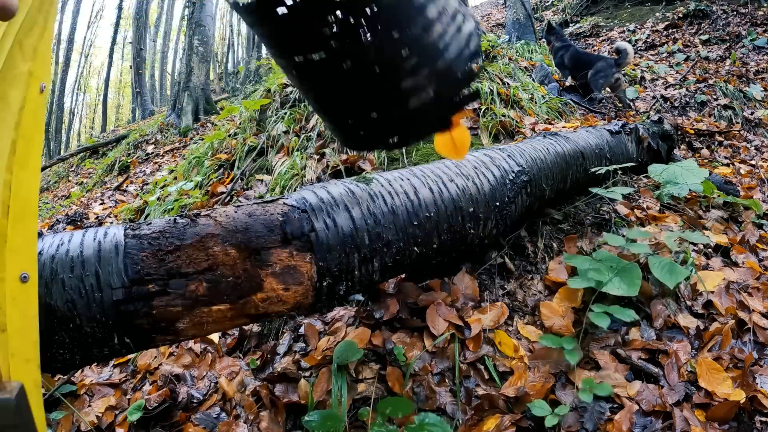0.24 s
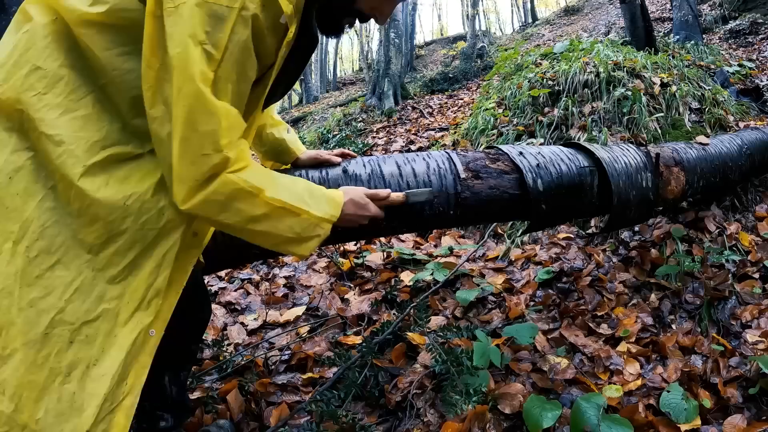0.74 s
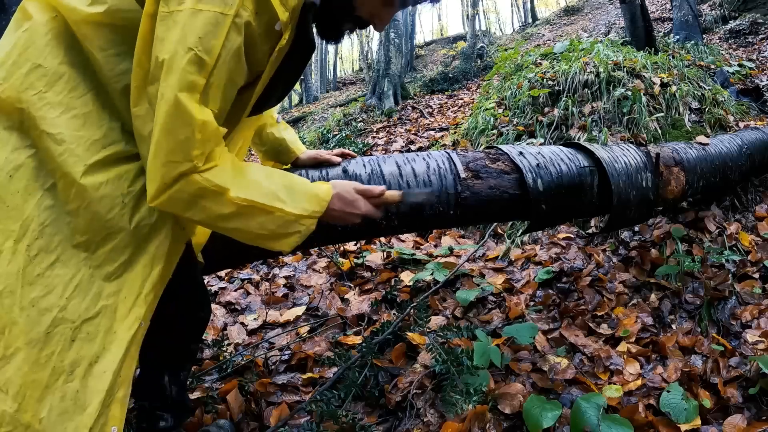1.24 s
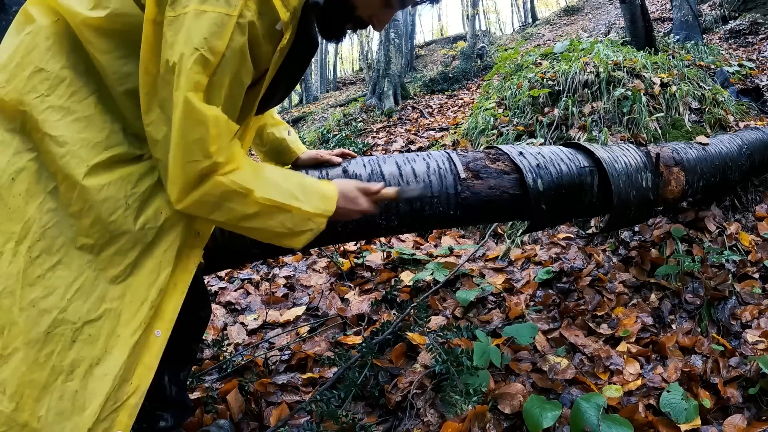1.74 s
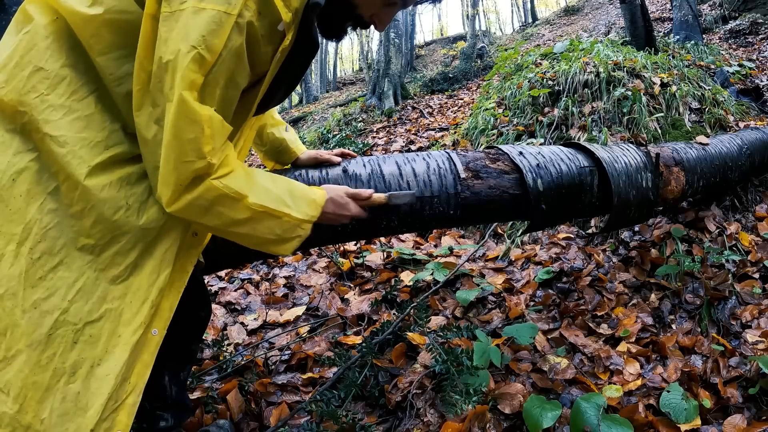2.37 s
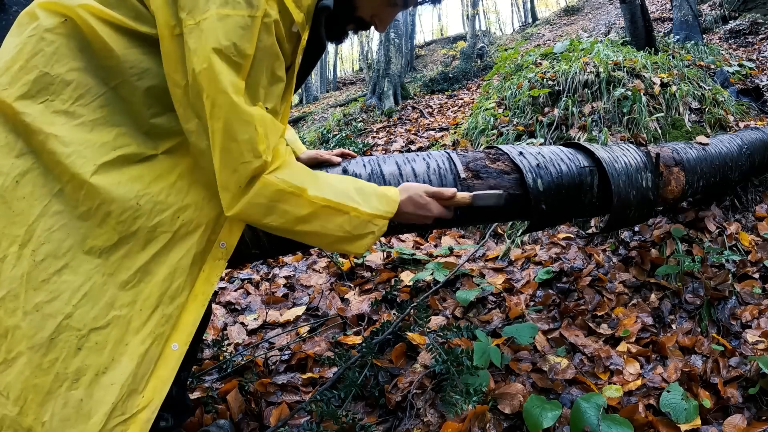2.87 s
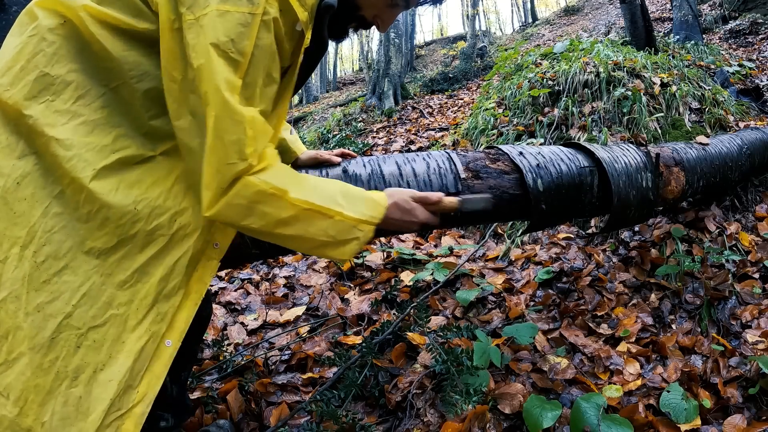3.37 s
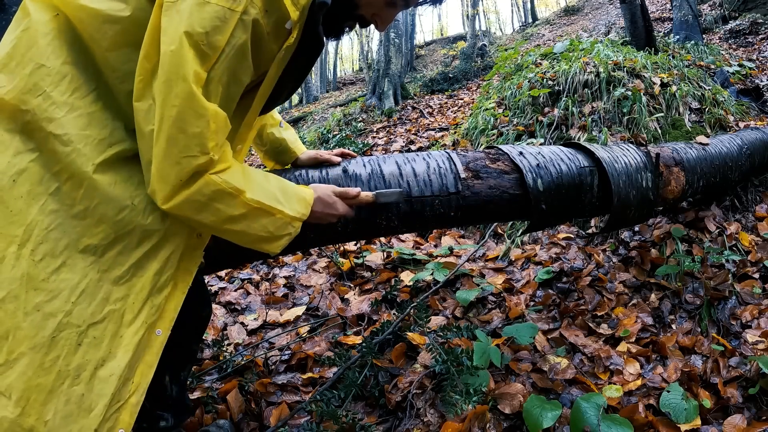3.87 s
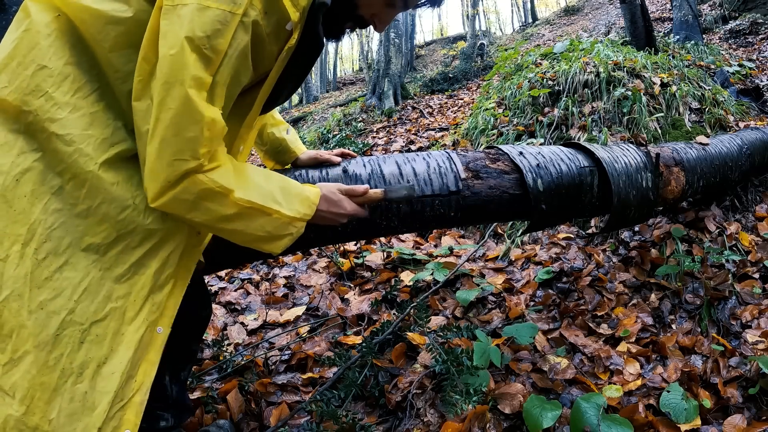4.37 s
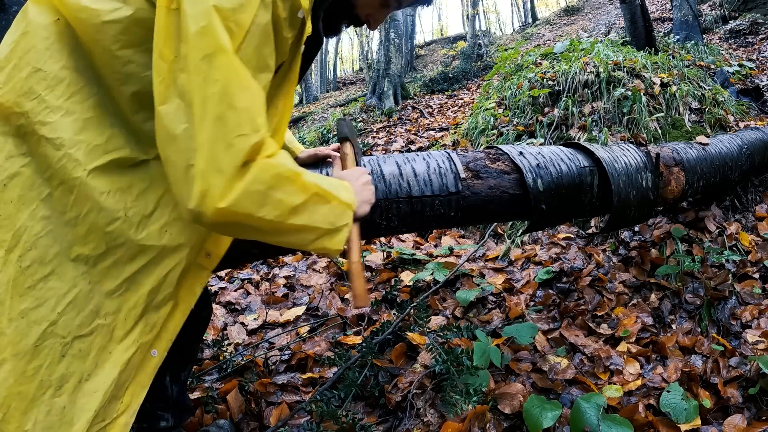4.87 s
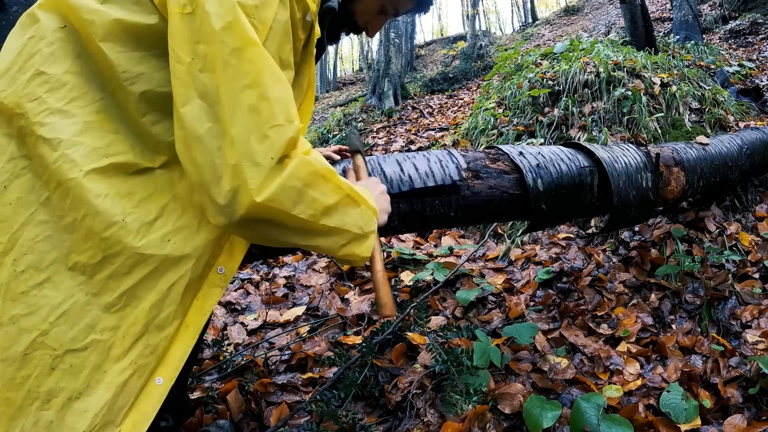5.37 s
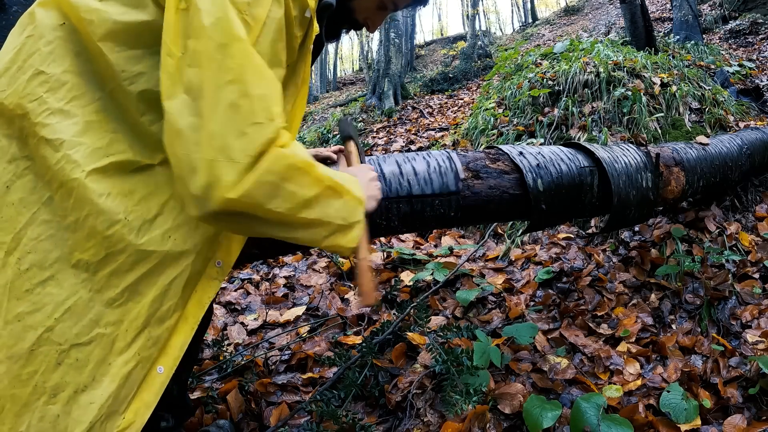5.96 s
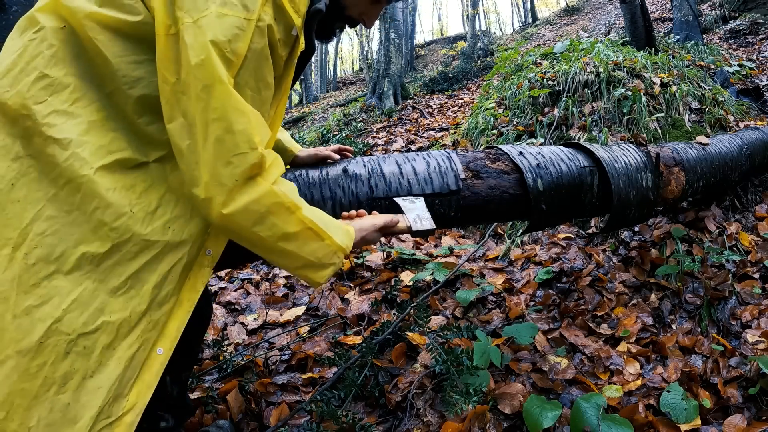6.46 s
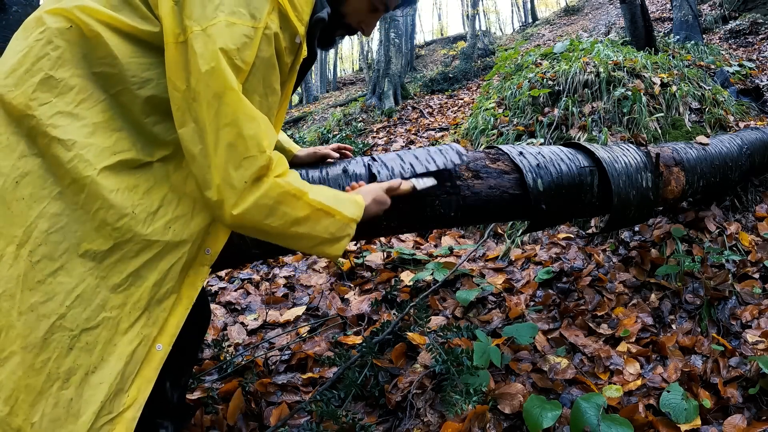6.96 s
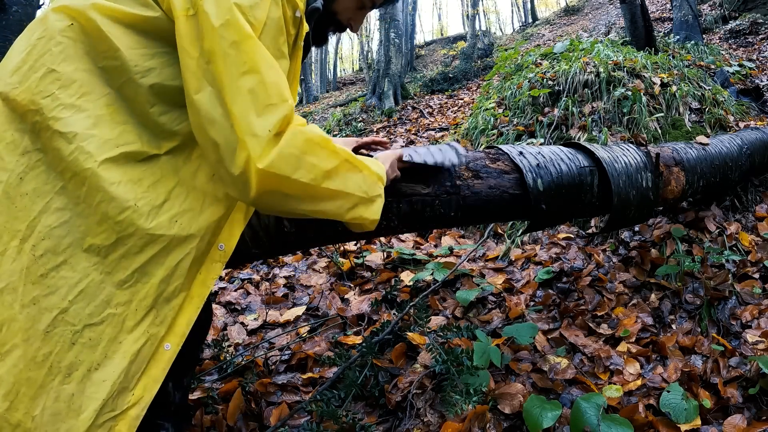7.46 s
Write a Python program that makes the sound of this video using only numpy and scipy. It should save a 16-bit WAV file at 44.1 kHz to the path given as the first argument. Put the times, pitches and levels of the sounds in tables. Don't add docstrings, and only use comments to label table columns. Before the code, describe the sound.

In a quiet wet forest, a sheet of bark crackles and snaps onto leaves, thinning within half a second. A small blade then bites a log in irregular dry knocks, the hardest near two, three and four seconds, with short hollow wooden thuds. Fibres tick and a stiff coated jacket rubs between blows. Close stereo microphone, slight low wind rumble.

```python
import sys
import numpy as np
from scipy import signal
from scipy.fft import rfft, irfft, next_fast_len
from scipy.io import wavfile
from scipy.ndimage import uniform_filter1d, map_coordinates

SR = 44100
rng = np.random.default_rng(int(sys.argv[2]) if len(sys.argv) > 2 else 0)


def transcribe(u):
    v = np.clip(np.atleast_2d(u).T, -1, 1)
    q = np.round(v * 32767).astype(np.int16)
    wavfile.write(sys.argv[1], SR, q)


def undo_db(level):
    steps = np.asarray(level, float) / 20
    return 10 ** steps


N = 340011

TICK_T60_S, TICK_CRACK_DB = .009, -16


def unit(x):
    return x / np.sqrt(np.mean(x ** 2) + 1e-20)


def gain(points, hz):
    f, db = np.transpose(points)
    return undo_db(np.interp(np.log(hz + 1), np.log(f), db))


def curves(rows):
    s, *cols = np.transpose(rows)
    return [np.interp(np.arange(N) / SR, s, c) for c in cols]


def wobble(rate):
    knots = rng.standard_normal(int(N * rate / SR) + 4)
    return map_coordinates(knots, [np.arange(N) * rate / SR])


def filtered(x, response):
    m = next_fast_len(x.shape[-1] + 2048)
    return irfft(rfft(x, m) * response(np.fft.rfftfreq(m, 1 / SR)), m)[..., :x.shape[-1]]


def add(track, s, sound):
    i = round(s * SR)
    track[..., i:i + sound.shape[-1]] += sound


def rush(colour, side_db, grain_db, patchy_db):
    z = signal.stft(rng.standard_normal((2, N)), nperseg=512)[2]
    patches = uniform_filter1d(rng.standard_normal(z.shape[1:]), size=6, axis=0)
    patches = uniform_filter1d(patches, size=8, axis=1)
    pair = signal.istft(z * undo_db(patchy_db * unit(patches)), nperseg=512)[1][:, :N]
    mid, side = filtered(pair * undo_db(grain_db * wobble(700)), lambda hz: gain(colour, hz))
    side = undo_db(side_db) * filtered(side, lambda hz: 1 + (hz / 11500) ** 3)
    return unit(np.array([mid + side, mid - side]))


def from_log(x):
    # frequency_hz, left_minus_right_db, left_lead_rad
    ports = [(60, .2, -.04), (300, -.3, -.1), (1000, -.8, -.28), (2700, -.8, -.4), (7600, 1.5, -.25),
             (10800, 2.5, -.4), (12200, .5, -2.3), (15000, .5, -2.3)]
    f, db, lead = np.transpose(ports)
    half = lambda hz: undo_db(np.interp(hz, f, db) / 2) * np.exp(.5j * np.interp(hz, f, lead))
    return np.array([filtered(x, half), filtered(x, lambda hz: 1 / half(hz))])


def snaps(rows, rough_db, upper_db, narrow):
    out, t = np.zeros(N + SR), np.arange(1300) / SR
    noise = rng.standard_normal((len(rows), 2, len(t)))
    bright = filtered(noise[:, 0], lambda f: 1 / (1 + (3500 / (f + 1)) ** 4) / (1 + (f / 11000) ** 4))
    for (s, db, hz, t60, crack_db), fizz, raw in zip(rows, bright, noise[:, 1]):
        decay = undo_db(-60 * t / max(t60, .001))
        upper_hz = hz * (2.09 + 0.4 * raw[0])
        upper = undo_db(upper_db) * np.sin(2 * np.pi * upper_hz * t) * decay
        onset = 1 - np.exp(-(1.3 * t * hz) ** 2)
        ring = (upper - np.sin(2 * np.pi * hz * t)) * onset * decay
        resonance = lambda f: (f * hz / (hz * hz + f * f)) ** narrow / (1 + (f / hz / 3) ** 2)
        rough = unit(filtered(raw, resonance))
        ring = ring / np.abs(ring).max() + undo_db(rough_db) * rough * np.sqrt(decay)
        late = t - .55 / hz
        crack_t60 = .002 + .5 * t60
        crack = undo_db(crack_db + 4) * fizz * undo_db(-60 * np.maximum(late, -6 * late) / crack_t60)
        add(out, s - 0.5 / hz, undo_db(db) * (ring + crack))
    return out[:N]


def crack_level(db, hz):
    return db - 3 * np.log2(hz / 3500)


def forest():
    # frequency_hz, level_db
    wash_colour = [(100, -42), (170, -4), (330, 2.5), (500, -3), (1000, -6), (2500, -45), (8000, -37),
                   (15000, -35)]
    # frequency_hz, level_db
    rumble_colour = [(12, -35), (30, -0.5), (65, -2.5), (110, -7.5), (160, -15), (300, -47)]
    # time_s, level_db
    wind = [(0, -51.5), (.3, -49.5), (.5, -61), (.9, -55), (1.6, -61), (2.3, -56.5), (2.55, -65),
            (2.9, -54), (3.3, -56), (3.6, -64.5), (4.1, -61.5), (4.5, -62.5), (5.2, -58.5), (6, -57),
            (6.5, -54.5), (6.75, -56.5), (7.2, -54), (7.71, -52.5)]
    wash = undo_db(-59.5) * rush(wash_colour, side_db=-13, grain_db=0.0, patchy_db=1.0)
    lumps = undo_db(2.5 * wobble(9))
    rumble = unit(lumps * rush(rumble_colour, side_db=-25.0, grain_db=-2.8, patchy_db=2.0))
    return wash + undo_db(curves(wind)[0]) * rumble


def rubbing():
    # middle_s, width_s, rub_db, hiss_over_rub_db
    sweeps = [
        (2.73, 0.2, -44, -8),
        (3.63, 0.11, -47, -3),
        (5.81, 0.036, -45, -14.5),
        (6.135, 0.04, -45, -7.5),
        (6.43, 0.095, -42, -3),
        (7.04, 0.085, -44.5, -2),
        (7.47, 0.19, -49.5, -6),
    ]
    # fastest_s, width_s, rub_db, hiss_over_rub_db
    swishes = [(.05, 0.1, -42.5, -7.5), (.13, 0.051, -45.5, 0.5), (.25, 0.13, -51, -4),
               (.45, 0.1, -51.5, -4.5), (.76, 0.39, -57, -7.5), (1.44, 0.061, -54.5, -16.5),
               (1.79, 0.055, -51.5, -9), (2.1, 0.44, -60.5, -5), (2.62, 0.28, -78, -21),
               (3.03, 0.091, -56, -7), (3.27, 0.12, -58.5, -3.5), (3.52, 0.13, -53, -11),
               (3.77, 0.13, -53.5, -11), (4.4, 0.22, -52, -9), (4.7, 0.26, -63, 1),
               (5.62, 0.025, -51, -4.5), (5.93, 0.36, -60, -1), (6.055, 0.034, -52, -4),
               (6.2, 0.036, -46.5, -9.5), (6.285, 0.095, -50, -9), (6.55, 0.11, -50.5, -16.5),
               (6.78, 0.29, -53, -13), (7.17, 0.091, -49, -16), (7.33, 0.2, -58, -7.5),
               (7.62, 0.044, -52, -3.5), (7.71, 0.081, -47.5, -4)]
    jolts = [
        1.201,
        1.565,
        5.173,
        5.451,
    ]
    lag_s, jolt_width_s, jolt_db, jolt_hiss_db = 0.048, 0.096, -49, -10.5
    rest_db, rest_hiss_db = -59, -8.5
    flank_db, tail = 14.5, 1.094
    shaken = [(s + lag_s, jolt_width_s, jolt_db, jolt_hiss_db) for s in jolts]
    s, width, db, hiss_db = np.transpose(list(sweeps) + list(swishes) + shaken)[..., None]
    t = np.linspace(0, N / SR, num=2000)
    away = np.maximum(s - t, (t - s) / tail) / width
    shape = np.where(np.arange(len(s)) < len(sweeps), 2.2, 1.4)[:, None]
    power = undo_db(-2 * np.minimum(flank_db * away ** shape - db, 200))
    body = undo_db(2 * rest_db) + power.sum(axis=0)
    hiss = undo_db(2 * (rest_db + rest_hiss_db)) + (power * undo_db(2 * hiss_db)).sum(axis=0)
    return curves(np.transpose([t, 10 * np.log10(body), 10 * np.log10(hiss)]))


def jacket():
    # frequency_hz, level_db
    body_colour = [(150, -21), (350, -9.5), (700, -15), (1100, -6.5), (1450, -7), (1900, -12),
                   (3000, -25.5), (5000, -48.5)]
    # frequency_hz, level_db
    hiss_colour = [(1200, -21), (2200, 2), (3200, 3), (7000, 2), (15000, -12.5)]
    # time_s, level_db
    facing = [(0, 1), (1.5, -19), (4.1, -3), (4.9, 3), (6.1, 4), (6.75, -15), (7.1, 6.5), (7.71, 4)]
    body_db, hiss_db = rubbing()
    flutter = 1.3 * wobble(35)
    body = undo_db(body_db - 1.5 + flutter) * rush(body_colour, side_db=-10.0, grain_db=2.0, patchy_db=2.5)
    hiss = undo_db(hiss_db + 5.5 + flutter) * rush(hiss_colour, side_db=-10.5, grain_db=1.5, patchy_db=1.5)
    struck = rng.random(N) < 250 / SR
    crinkles = struck * rng.standard_normal(N) * np.sqrt(rng.exponential(size=N))
    crinkles = unit(filtered(crinkles, lambda hz: gain(hiss_colour, hz * 2) / (1 + hz / 5000)))
    hiss += undo_db(hiss_db - 6) * crinkles
    sheen = filtered(hiss, lambda hz: 1 / (1 + (9000 / (hz + 1)) ** 8))
    hiss = hiss + undo_db(curves(facing)[0]) * sheen
    return body * undo_db([[.7], [-.7]]) + hiss * undo_db([[1.5], [-1.5]])


def squeak():
    # time_s, slip_rate_hz, level_db
    threads = [
        [(3.555, 1120, -70), (3.572, 1140, -53), (3.6, 1160, -55), (3.64, 1230, -55), (3.665, 1270, -54),
         (3.7, 1240, -70)],
        [(3.585, 1070, -70), (3.605, 1075, -51), (3.63, 1040, -51), (3.655, 1005, -55), (3.675, 990, -70)],
        [(6.355, 1480, -66), (6.372, 1430, -49), (6.39, 1370, -53), (6.412, 1280, -51), (6.43, 1150, -62),
         (6.445, 1140, -54), (6.458, 1290, -54), (6.473, 1320, -49), (6.49, 1150, -64)],
    ]
    thread_tilt = [1, 1.5, -6]
    out = np.zeros(N)
    for rows, tilt_db in zip(threads, thread_tilt):
        hz, db = curves(rows)
        on = np.gradient(hz) != 0
        turn = 2 * np.pi * np.cumsum((hz * (1 + .008 * wobble(90)))[on]) / SR
        grip = 7 + 3.5 * wobble(50)
        tones = 0
        for k, level in enumerate([0, -4, -5, -8], start=1):
            unsteady = np.roll(grip, k * SR // 4)[on]
            tones = tones + undo_db(level + (k - 1) * tilt_db + unsteady) * np.sin(k * turn)
        out[on] += undo_db(db[on]) * tones
    return out * undo_db([[1.2], [-1.2]])


def ground(x):
    t = np.arange(SR // 5) / SR
    decay = undo_db(-60 * t / 0.02) + undo_db(-26.5 - 60 * t / 0.33)
    tail = rng.standard_normal((2, len(t))) * decay
    return signal.fftconvolve(x[None], tail / np.linalg.norm(tail[0]), axes=1)[:, :N]


def specks():
    # start_s, peak_db, pitch_hz
    small_flakes = [(0.055, -27, 1920), (.066, -36, 1500), (.14, -38, 3300), (.165, -39, 3000),
                    (.333, -37, 7500), (.374, -48, 2500), (0.3958, -35, 4500), (0.4, -43, 3800),
                    (.429, -34, 6700), (0.4487, -40, 3500), (.502, -36, 4800), (.597, -39, 600),
                    (0.605, -39, 970), (.608, -41, 660), (2.187, -43.5, 2900), (2.292, -48, 3700),
                    (2.303, -46, 7500), (2.318, -45, 7100), (2.456, -43, 5500), (2.487, -31.5, 3530),
                    (2.4895, -41.5, 1560), (6.493, -37, 1390), (6.526, -44, 2010), (6.562, -43, 1180),
                    (7.205, -47, 1370), (7.252, -43, 2500), (7.256, -39, 1120), (7.634, -45, 1500),
                    (7.4445, -44, 2300), (7.4963, -40, 1200), (7.513, -37, 2200), (0.084, -36, 4500),
                    (.105, -37, 2800), (.12, -33, 5200), (.462, -43, 6000), (.485, -43, 2500)]
    rows = [(s, db, hz, TICK_T60_S, TICK_CRACK_DB) for s, db, hz in small_flakes]
    return from_log(snaps(rows, rough_db=-4, upper_db=-24, narrow=1.7))


def loose_fibres():
    # start_s, peak_db, pitch_hz
    ticks = [(0.785, -39, 2300), (1.158, -38, 1500), (2.1867, -39.5, 1420), (2.69, -38, 1500),
             (3.0116, -39.5, 1180), (3.4942, -40.5, 1540), (3.658, -38, 3700), (3.726, -35.5, 1440),
             (3.7373, -33, 1280), (3.976, -44.5, 1190), (4.4044, -35, 916), (4.419, -37, 1360),
             (4.4543, -43, 1140), (4.7424, -42, 3030), (5.5066, -39, 1030), (5.809, -39.5, 2130),
             (5.8354, -35.5, 1030), (6.061, -44, 2440), (6.11, -42, 2440), (6.18, -38, 1360),
             (6.286, -42, 1560), (6.346, -40, 1120), (6.544, -40, 1270), (6.5851, -38, 1170),
             (7.2529, -43, 680), (7.315, -46, 4020), (7.365, -41, 1800), (7.389, -38, 2150),
             (7.404, -43, 1800), (7.426, -40, 1190), (7.431, -45, 1400), (7.4359, -33, 1160),
             (7.445, -32, 1510), (7.471, -36, 1900), (7.475, -41, 1100), (7.4905, -32, 2460),
             (7.4947, -33, 1270), (7.507, -34, 1300), (7.5154, -30, 1260), (7.528, -41, 1450),
             (7.629, -39, 1490), (7.6319, -34.5, 1110), (7.704, -38, 3050)]
    rows = [(s, db, hz, TICK_T60_S, crack_level(TICK_CRACK_DB, hz)) for s, db, hz in ticks]
    return snaps(rows, rough_db=-4, upper_db=-14, narrow=4)


def bark_sheet():
    # start_s, peak_db, pitch_hz
    sheet_snaps = [(.017, -38, 4100), (.042, -26, 1180), (.0508, -19.5, 1910), (.0512, -20.5, 4180),
                   (.0515, -25.5, 7000), (0.0605, -22.5, 4030), (.0762, -34, 2560), (.0765, -33, 6300),
                   (.095, -39, 2480), (.0955, -33, 3430), (.113, -34, 6800), (0.1306, -24.5, 4700),
                   (0.135, -25, 3460), (0.1367, -36, 3370), (.1611, -34, 2500), (.1615, -31, 3800),
                   (0.1833, -34, 7650), (.184, -34, 3900), (.209, -33, 4940), (.2125, -29.5, 6640),
                   (0.2257, -32.5, 1310), (.2773, -39, 1390), (0.303, -42, 4130), (.3306, -37, 6500),
                   (0.338, -36.5, 4600), (0.379, -33.5, 6500), (0.398, -35.5, 3330), (0.426, -35, 3960),
                   (.432, -40, 2200), (.437, -38, 2900), (.447, -40, 1700), (.4748, -46, 1510),
                   (.496, -37, 3000), (0.4994, -35.5, 3720), (0.509, -34.5, 4320), (.521, -47, 2290),
                   (0.5445, -43, 4200), (.626, -49, 7100), (.642, -44, 4000), (.672, -44, 5100),
                   (.735, -42.5, 6660)]
    # start_s, end_s, flake_count, mean_peak_db
    spells = [
        (0, .17, 45, -41),
        (.17, .3, 14, -45),
        (.3, .55, 30, -49),
    ]
    flakes = []
    for a, b, count, db in spells:
        for when, size, pitch in rng.random((int(count), 3)):
            flakes.append((a + (b - a) * when, db + 8 * (size - .5), 1400 * 5 ** pitch))
    t60_s, crack_db = 0.0095, -6.5
    rows = [(s, db, hz, t60_s, crack_level(crack_db, hz)) for s, db, hz in list(sheet_snaps) + flakes]
    return snaps(rows, rough_db=-2, upper_db=-9, narrow=2.5)


def thumps():
    # start_s, push_peak_db, push_hz, push_t60_s, ringing_db
    blows = [(0.5896, -36.5, 469, 0.039, -54), (0.845, -37.5, 318, 0.021, -64.5),
             (1.099, -23, 464, 0.019, -29), (1.139, -6, 480, 0.007, -47), (1.145, -26, 198, 0.015, -48),
             (1.2, -19.5, 285, 0.014, -36), (1.565, -23, 314, 0.025, -28), (1.928, -17, 287, 0.023, -15.5),
             (2.034, -27, 341, 0.021, -56), (2.485, -30.5, 442, 0.019, -75),
             (2.829, -40.5, 236, 0.093, -36), (3.167, -9, 294, 0.018, -15),
             (4.353, -14.5, 390, 0.013, -29.5), (5.451, -19.5, 308, 0.015, -24.5),
             (5.7418, -17.5, 280, 0.046, -22.5), (6.016, -19, 287, 0.042, -24.5),
             (5.177, -30.5, 355, 0.013, -51), (7.086, -37, 375, 0.018, -46), (7.254, -45, 350, 0.02, -61)]
    # frequency_hz, level_db, t60_s
    log_modes = [(73, -10.5, 0.1), (166.6, -1.5, 0.1), (218, -6.5, 0.07), (266, -7.5, 0.071),
                 (306, -3.5, 0.043), (391, -15, 0.058)]
    # multiple_of_push, level_db
    shell_modes = [(1, 0), (1.48, -8), (2, -5), (2.55, -11)]
    sag, sag_s = 0.27, 0.019
    out, t = np.zeros(N + SR), np.arange(SR // 3) / SR
    sagging_t = t + sag * sag_s * (1 - np.exp(-t / sag_s))
    chance = rng.standard_normal((len(blows), len(log_modes)))
    for (s, db, hz, t60, ring_db), spread in zip(blows, chance):
        shell = sum(undo_db(level - 60 * t * k ** 0.5 / t60) * np.sin(2 * np.pi * k * hz * t)
                    for k, level in shell_modes)
        push = -undo_db(db + 7.0) * shell * (1 - np.exp(-t / 0.0013))
        sharp, share = (1.14, 0.9) if s > 5 else (1, 1)
        ring = 0
        for (f, level, life), d in zip(log_modes, spread):
            mode_hz = f * sharp * (1 + 0.065 * d)
            decay = undo_db(level + 2 * d - 60 * t / life / share)
            ring = ring + decay * np.sin(2 * np.pi * mode_hz * sagging_t)
        add(out, s, push - undo_db(ring_db) * ring * (1 - np.exp(-t / 0.0049)))
    return out[:N]


def crunch():
    # start_s, length_s, peak_rms_db, centre_hz, fall_t60_s
    strokes = [(.036, 0.018, -23.5, 2620, 0.028), (.126, 0.01, -23.5, 3480, 0.012),
               (0.588, 0.0051, -33.5, 890, 0.043), (1.112, .012, -36, 1060, 0.19),
               (1.183, 0.011, -24, 2540, 0.055), (1.555, 0.0051, -27, 1400, 0.072),
               (1.897, 0.029, -15, 2900, 0.034), (2.003, 0.02, -38, 1460, 0.24),
               (2.815, 0.012, -27.5, 2800, 0.039), (3.135, 0.027, -17.5, 2980, 0.033),
               (4.334, .011, -15.5, 2026, 0.045), (4.437, 0.0037, -33, 1460, 0.086),
               (5.167, 0.0082, -22.5, 4030, 0.049), (5.437, 0.0076, -25, 1860, 0.046),
               (5.728, 0.011, -26.5, 1920, 0.05), (5.999, 0.01363, -20, 2400, 0.045),
               (7.441, 0.059, -41, 1800, 0.087)]
    # frequency_hz, width_hz, level_db
    blade_modes = [(3750, 70, 17), (6250, 180, 5), (7500, 180, 6)]
    out, t = np.zeros(N + SR), np.arange(SR // 8) / SR
    steel = lambda f: sum(undo_db(db) * 1j * f * w / (c * c - f * f + 1j * f * w) for c, w, db in blade_modes)
    for s, length, db, hz, t60 in strokes:
        sizes = np.repeat(rng.standard_normal(len(t) // 26 + 1), 26)[:len(t)]
        grains = rng.standard_normal(len(t)) * undo_db(2.74 * sizes)
        colour = lambda f: (f / hz) ** 2 / (0.021 + (f / hz) ** 2) / (1 + (f / hz) ** 1.16)
        swell = undo_db(-22 * (1.5 - t / length))
        fall = undo_db(-60 * (t - length) / t60)
        cutting = t < length
        stroke = unit(filtered(grains, colour)) * np.where(cutting, swell, fall)
        deep = .02 < length < .04 and hz > 2000
        singing = deep * filtered(stroke * cutting, steel)
        add(out, s, undo_db(db) * (stroke * np.where(deep & cutting, .5, 1) + singing))
    return out[:N]


def blade_cuts():
    # start_s, peak_db, pitch_hz, crack_db
    hard_bites = [(.6008, -39.5, 983, -18), (1.1389, -34, 640, -15), (1.1925, -11.5, 2500, -16),
                  (1.1973, -15, 1200, -14), (1.1974, -10, 3130, -11), (1.5612, -27, 2420, -26),
                  (1.5629, -17.5, 1010, -10), (1.9256, -2, 3100, -1), (1.9216, -3.5, 1830, -19),
                  (1.9268, -4.5, 630, -19), (2.0276, -25, 2540, -0.5), (2.4834, -26, 6700, -23),
                  (2.4827, -21, 1290, -15), (2.747, -23, 1550, -4), (2.8273, -16, 3400, -9),
                  (3.1517, -20, 870, -10), (3.1582, -14, 3060, -22), (3.1596, -26, 4300, -14),
                  (3.166, -23, 3500, -15), (3.1623, -24, 2970, 4), (4.3468, -17, 7360, -23),
                  (4.3462, -28, 2200, -8), (4.347, -24, 2500, -11), (4.3468, -0.5, 7700, -21),
                  (4.3493, -14.5, 1290, -19), (4.352, -24, 2930, 3), (4.3517, -24, 6700, -30),
                  (4.442, -16, 1420, -8), (5.4413, -14, 2020, -25), (5.4492, -20, 1070, -16),
                  (5.7332, -26.5, 1550, 0), (5.7385, -22.5, 2520, -9), (5.7385, -15, 2090, -4),
                  (6.0117, -13.5, 1720, -8), (7.0871, -23, 860, -23), (1.137, -24, 1850, -16),
                  (6.0134, -19, 3420, -8), (7.4925, -18.5, 1490, -32)]
    # start_s, peak_db, pitch_hz, crack_db
    wet_tears = [(0.5901, -39, 830, 3.5), (0.8409, -27, 2030, -14), (.8455, -30, 910, -7),
                 (1.1008, -26.5, 1000, -12), (1.128, -33, 900, -22), (1.1356, -27, 800, -24),
                 (1.191, -17, 846, -21), (1.261, -27, 1250, -10), (1.563, -20, 840, -16),
                 (1.5784, -32, 870, -15), (1.915, -23, 680, -9), (1.905, -42, 800, -5.5),
                 (2.0174, -31.5, 760, -25), (2.033, -29, 1350, -14), (2.832, -25.5, 1280, -1),
                 (2.8406, -28, 3350, -5), (4.3364, -25, 965, -12), (4.34, -24, 2320, -2),
                 (4.433, -31, 1990, -15.5), (5.1697, -20, 1066, -5), (5.4463, -17.5, 1180, -0.5),
                 (5.735, -21, 1190, -9), (6.008, -23, 1000, 8), (6.0134, -46, 1730, 12),
                 (6.0139, -18, 860, 4.5), (7.443, -27.5, 1350, -19)]
    # start_s, peak_db, pitch_hz, t60_s, crack_db
    edge = [
        (5.1762, -16.5, 1430, 0.0032, 8.5),
    ]
    bites = [(s, db, hz, .0025, crack_db) for s, db, hz, crack_db in hard_bites]
    tears = [(s, db, hz, .011, crack_db) for s, db, hz, crack_db in wet_tears]
    return snaps(bites + tears + list(edge), rough_db=-12, upper_db=-2.5, narrow=1)


def shocks():
    # start_s, peak_db, rebound_hz, t60_s, sharpness_hz
    stops = [
        (1.5608, -6.5, 1700, 0.0024, 3200),
        (1.9253, -4, 1100, 0.0048, 9000),
        (2.4838, -13, 1470, 0.0043, 2900),
        (3.1618, 2, 770, 0.0059, 9200),
        (4.346, -15.5, 1480, 0.0024, 9000),
        (4.3468, -2.5, 744, 0.0056, 9000),
        (4.3519, -7, 780, 0.004, 9000),
        (7.4895, -20.5, 1980, 0.004, 4170),
    ]
    rise_s, build = .00017, 1.7
    out, t = np.zeros(N + SR), np.arange(-300, 600) / SR
    for s, db, hz, t60, edge_hz in stops:
        back = -np.cos(2 * np.pi * hz * t) * undo_db(-60 * np.abs(t) / max(t60, .001))
        step = np.where(t < 0, build * np.exp(-np.abs(t) / rise_s), back)
        radiation = lambda f: 1 / (1 + (.4 * hz / (f + 1)) ** 4) / (1 + (f / edge_hz) ** 6)
        add(out, s + t[0], undo_db(db) * filtered(step, radiation))
    return out[:N]


def scene():
    # middle_s, width_s, level_db
    lulls = [
        (1.38, 0.063, -0.5),
        (3.38, 0.047, -0.5),
        (4.1, 0.089, -3.5),
        (5.0, 0.079, 0),
        (5.88, 0.045, -0.5),
        (6.72, 0.062, -2),
    ]
    bark = bark_sheet()
    blade = blade_cuts() + loose_fibres() + crunch() + shocks()
    log = thumps()
    near = bark * undo_db([[1.2], [-1.2]]) + from_log(blade + log)
    echo = undo_db(-9) * ground(bark) + undo_db(-17) * ground(blade + undo_db(-6) * log)
    t = np.arange(N) / SR
    hush = undo_db(sum(db * np.exp(-((t - s) / width) ** 2) for s, width, db in lulls))
    return near + echo + squeak() + hush * (jacket() + forest()) + specks()


def low_pass(x):
    return signal.sosfilt(signal.butter(12, 16650, fs=SR, output="sos"), x)


def record(dry):
    # frequency_hz, level_db
    housing = [(15, -14.5), (55, 1.5), (3400, -4), (4600, -7.5), (5350, -11.5), (5950, -5.5), (7400, -3),
               (8800, -11.5), (10500, -13.5), (12200, -11), (14300, -21.5), (16000, -37)]
    x = filtered(dry, lambda hz: gain(housing, hz))
    x = x / (1 + np.abs(x / .97) ** 6) ** (1 / 6)
    return low_pass(filtered(x, lambda hz: 1 / (1 + (hz / 16450) ** 90)))


dry = scene()
out = record(dry)
transcribe(out)
```